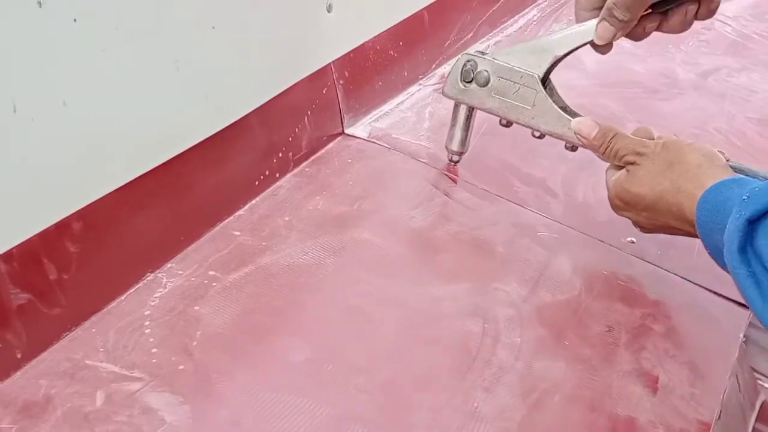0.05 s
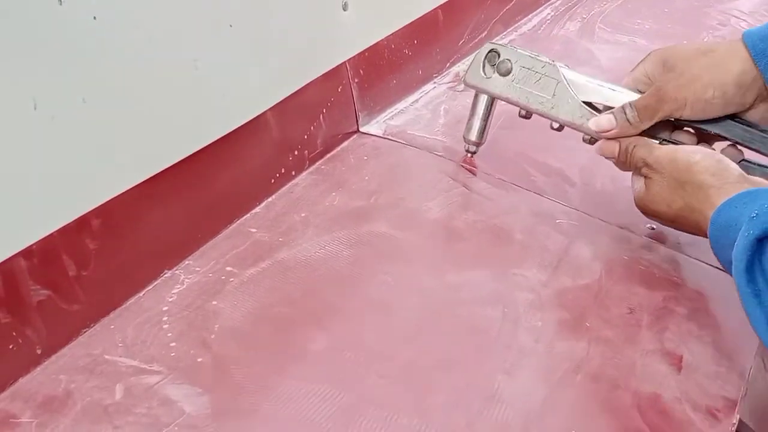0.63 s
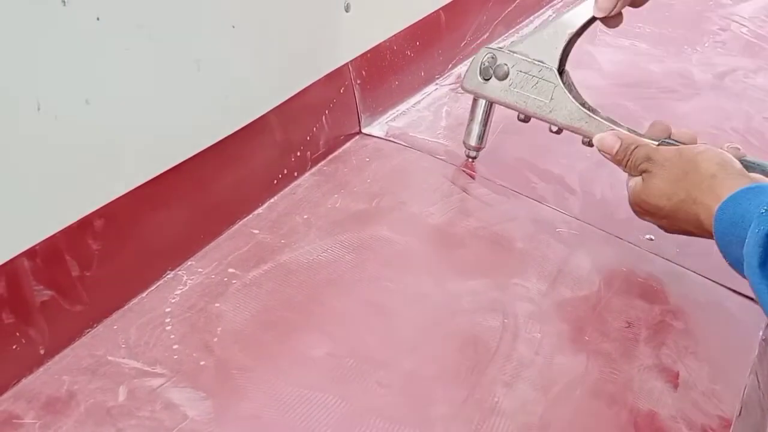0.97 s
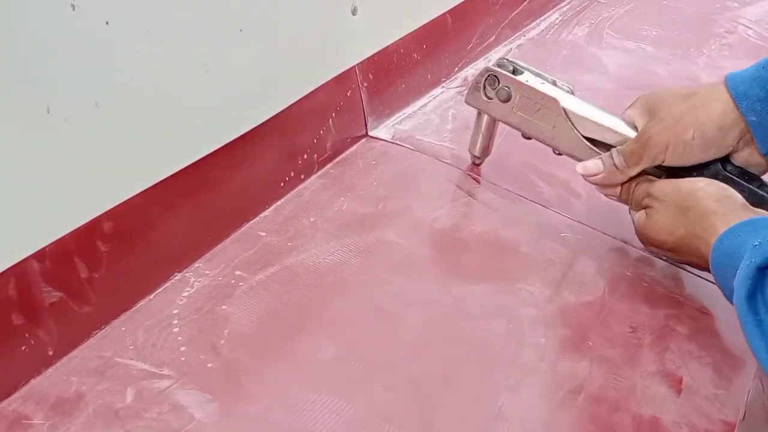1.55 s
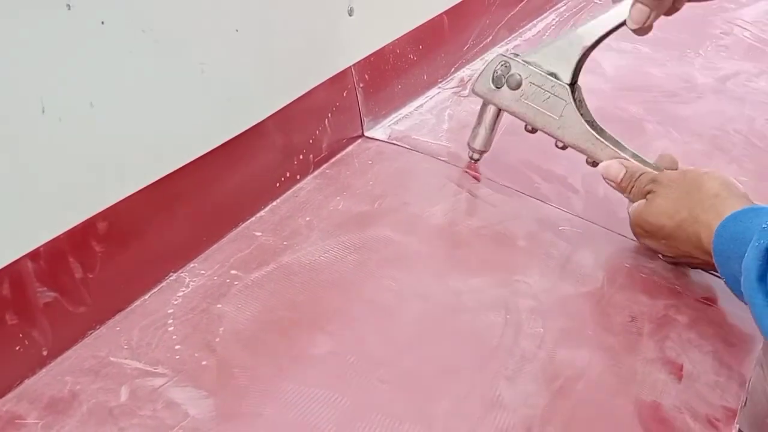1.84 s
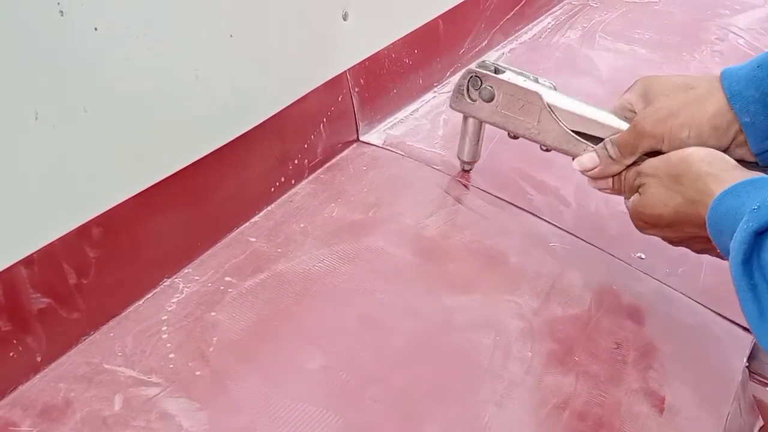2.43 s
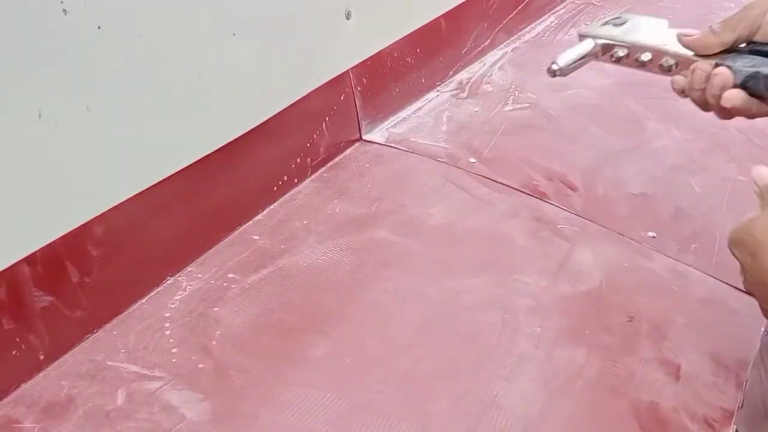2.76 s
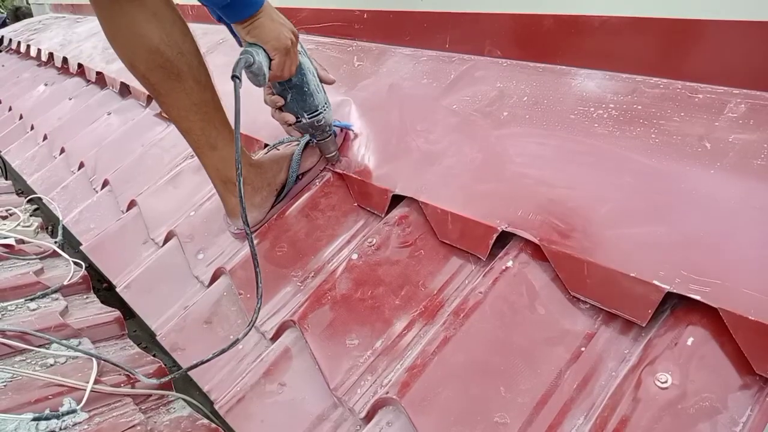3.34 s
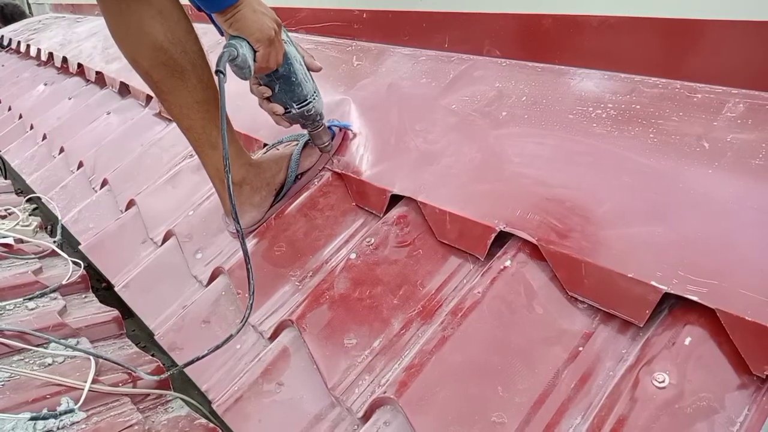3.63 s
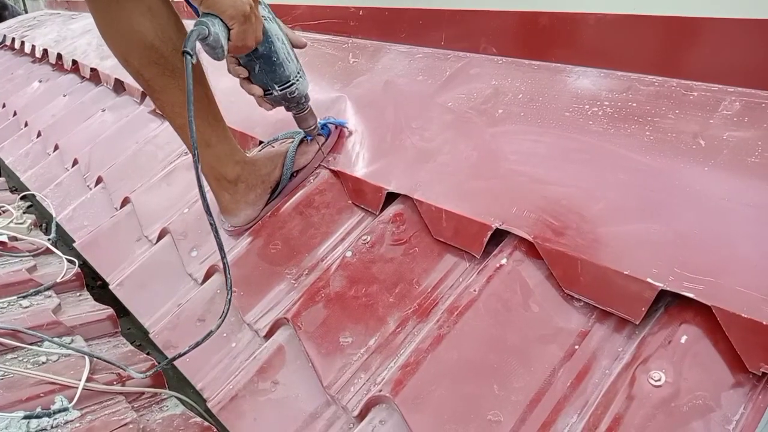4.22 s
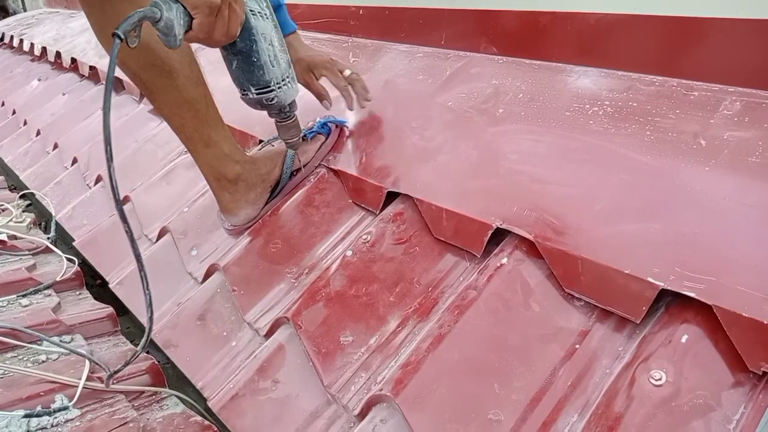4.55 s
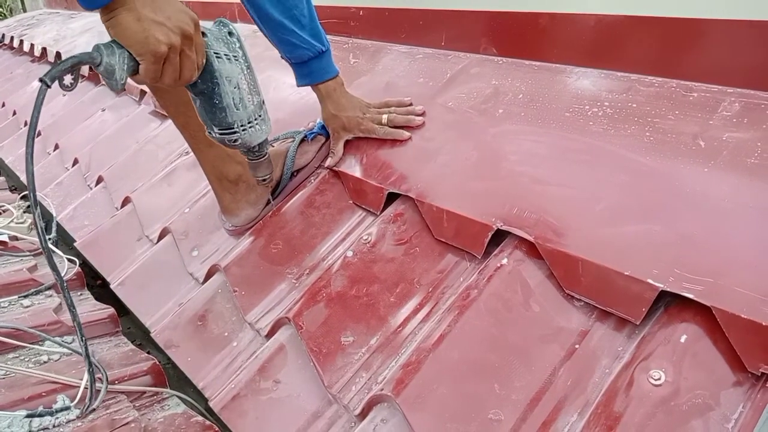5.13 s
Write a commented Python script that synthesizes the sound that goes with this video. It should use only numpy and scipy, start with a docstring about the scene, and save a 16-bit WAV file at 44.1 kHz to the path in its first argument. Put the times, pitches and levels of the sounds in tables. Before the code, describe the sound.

On a sheet-metal roof, a hand rivet gun clicks close to the microphone, its jolts crashing through the loose flashing while someone hammers dully far away. The lever squeals and the hardest snaps follow. After a moment of silence, an electric drill spins up with a high whine, scrapes and shrieks into the steel in three quick bites, then coasts down under gusts of wind rumbling on the microphone.

```python
"""On a sheet-metal roof, one microphone close to the work. From the start someone hammers far off, while
nearby a hand rivet gun clicks and its blows crash through the loose flashing. From about 1 s its lever
squeals, and the hardest snaps follow. Near 3 s comes a moment of silence. Then a corded drill spins up,
wind buffets the microphone, the bit bites into the steel three times, and the motor coasts down."""
import sys
import numpy as np
from scipy import signal
from scipy.fft import rfft, irfft, next_fast_len
from scipy.io import wavfile
from scipy.ndimage import uniform_filter1d

SR = 44100
rng = np.random.default_rng(int(sys.argv[2]) if len(sys.argv) > 2 else 0)


def output_pcm(signal):
    """Save a mono or channel-first signal as 16-bit PCM at the path in sys.argv[1].

    Samples are clipped to [-1, 1] before scaling.
    """
    pcm = np.clip(np.atleast_2d(signal).T, -1, 1) * 32767
    wavfile.write(sys.argv[1], SR, np.round(pcm).astype(np.int16))


N = 228481
TIME = np.arange(N) / SR
RIVETING_END_S, DRILL_START_S, FULL_LEVEL_S = 2.918, 3.115, 3.23


def from_db(db):
    """Decibels to gain."""
    return 10 ** (np.asarray(db) / 20)


def rms_one(x):
    """Scale to unit power."""
    return x / np.sqrt(np.mean(x ** 2) + 1e-20)


def at_hz(points, hz):
    """Read a spectrum on a log-frequency axis."""
    pitches, levels = np.array(points).T
    return np.interp(np.log(hz), np.log(pitches), levels)


def drift(rate_hz):
    """Smooth random wander with spread 1."""
    r = np.exp(-80 * np.pi * rate_hz / SR)
    slow = signal.lfilter([1], [1, -2 * r, r * r], rng.standard_normal(N // 40 + 2002))[2000:]
    return np.interp(np.arange(N) / 40, np.arange(len(slow)), rms_one(slow))


def noise(spectrum, size=N, tilt=0):
    """Noise of a given colour, tilted in dB per octave, falling off steeply past its ends."""
    padded = next_fast_len(size)
    hz = np.maximum(np.fft.rfftfreq(padded, 1 / SR), 1)
    octaves_outside = np.abs(np.log2(hz / np.clip(hz, spectrum[0][0], spectrum[-1][0])))
    gain = from_db(at_hz(spectrum, hz) + tilt * np.log2(hz) - 24 * octaves_outside)
    return rms_one(irfft(rfft(rng.standard_normal(padded)) * gain, padded)[:size])


def resonate(x, hz, width):
    """A resonance with gain 1 at its peak."""
    r = np.exp(-np.pi * width / SR)
    feedback = [1, -2 * r * np.cos(2 * np.pi * hz / SR), r * r]
    return signal.lfilter(np.array([1, 0, -1]) * (1 - r * r) / 2, feedback, x)


def low_pass(x, hz, order=2):
    """Butterworth low-pass."""
    return signal.sosfilt(signal.butter(order, hz, fs=SR, output="sos"), x)


def onset(t, rise_s=.0004):
    """Exponential rise from 0 to 1."""
    return 1 - np.exp(-t / rise_s)


def dying(t, t60):
    """Free decay, 60 dB in t60, full height before t = 0."""
    return np.exp(-np.log(1000) * np.maximum(t, 0) / max(t60, 1e-3))


def swell(s, half_s):
    """A brief bell-shaped rise and fall."""
    return np.exp(-.5 * ((TIME - s) / half_s) ** 2)


def small_ring(pitches, t):
    """A cluster of close modes, strongest in the middle."""
    weights = np.hanning(len(pitches) + 2)[1:-1]
    return weights @ np.sin(2 * np.pi * (pitches[:, None] * t + rng.random((len(pitches), 1))))


def add(out, s, sound):
    """Mix a sound in at a time."""
    start = max(round(s * SR), 0)
    out[start:start + len(sound)] += sound[:N - start]


# open air around the roof: (frequency [Hz], density [dB])
AIR_SPECTRUM = [(29, -50), (50, -18), (214, 11), (613, -5), (690, -16.5), (941, -8), (2630, -25.5),
                (3100, -17), (3340, -25), (4890, -18), (5380, -21), (6990, -30), (15000, -59.5)]
def outdoor_air(level_db=-47, fade_db_per_s=0.9):
    """The distant outdoor background wavers and slowly calms over a faint steady hiss."""
    background = from_db(level_db - fade_db_per_s * TIME + 2.9 * drift(24)) * noise(AIR_SPECTRUM)
    return background + from_db(-76.5) * rng.standard_normal(N)


# the hammer as heard from the roof: (frequency [Hz], density [dB])
HAMMER_SPECTRUM = [(59, -46.5), (100, -28), (134, -7.5), (187, -0.5), (540, -3), (675, -10.5), (810, -5),
                   (1130, -6), (1980, -29), (2800, -46.5), (3640, -67.5), (6160, -120)]
# its blows: (time [s], relative level [dB])
HAMMER_BLOWS = [(0, -40.5), (.277, -36.5), (0.554, -35), (1.118, -34), (1.386, -36), (1.92, -55),
                (2.148, -37)]
def far_hammer(rise_s=0.0077, t60=0.44, bass_t60=0.54, bass_hz=400):
    """Distant blows reach the microphone dull and smeared by the surrounding walls."""
    out, t = np.zeros(N), TIME[:SR * 3 // 4]
    for s, level_db in HAMMER_BLOWS:
        wash = noise(HAMMER_SPECTRUM, size=len(t), tilt=0.21)
        bass = low_pass(wash, bass_hz, order=1)
        thud = bass * dying(t, bass_t60) + (wash - bass) * dying(t, t60)
        add(out, s - rise_s, from_db(level_db + 4.5) * onset(t, rise_s) * thud)
    return out


# crash of the flashing, close by: (frequency [Hz], density [dB])
FLASHING_SPECTRUM = [(53, -57.5), (90, -26.5), (172, -7), (255, -1), (753, -7), (804, -3), (1110, -3),
                     (1540, -4.5), (1680, -6.5), (2530, -14), (3830, -8.5), (6870, -13), (11100, -30),
                     (15000, -27.5), (16000, -48.5)]
# its ringing: (frequency [Hz], relative level [dB], t60 [s])
FLASHING_MODES = [(355, -11.5, 1), (1215, -11.5, 0.49), (1440, -0.5, 0.12), (1520, 3, 0.41),
                  (2240, 0, 0.098), (2755, -2.5, 0.15), (3040, -39, 5.0), (4200, -13.5, 0.35),
                  (3950, -17, 1.2), (4910, -17.5, 0.45), (5600, -24, 4.7), (5636, -27, 0.41)]
# blows from the rivet gun: (time [s], level [dB], rattling time [s], t60 [s], tilt [dB/octave])
GUN_BLOWS = [(0, -43, 0.041, 0.14, -2), (.129, -30.5, 0.0061, .28, -1), (0.285, -39.5, .002, .13, -1),
             (.372, -44, 0.0016, 0.44, -1.5), (.459, -50, .004, 0.17, .5), (.738, -43, 0.0081, 0.28, 2.5),
             (.799, -22, 0.024, 0.3, -0.5), (1.329, -40, .02, 0.58, 1.5), (1.651, -33, 0.0036, 0.056, .5),
             (1.669, -41.5, 0.067, 0.78, 1.5), (1.727, -19.5, .012, 0.39, 0),
             (1.862, -35.5, 0.073, .16, -0.4), (2.266, -27.5, 0.018, 0.061, -2),
             (2.279, -19.5, 0.0046, 0.018, 1), (2.2997, -17.5, 0.0011, 0.041, 7),
             (2.303, -29.5, 0.055, .22, -0.5), (2.349, -28, 0.032, 0.34, -3.5),
             (2.539, -40, 0.015, 0.23, 0), (2.637, -50.5, 0.012, 0.055, 1.5)]
def flashing(bass_hz=600, treble_hz=7000, bass_t60_ratio=1.99, treble_t60_ratio=0.22):
    """Each blow rattles the loose sheet: a dense wash dies away, lows last, and hard blows clank."""
    out, t = np.zeros(N), TIME[:SR * 3 // 4]
    for s, level_db, rattle_s, t60, tilt in GUN_BLOWS:
        wash = noise(FLASHING_SPECTRUM, size=len(t), tilt=tilt)
        bass, body = low_pass(wash, bass_hz, order=1), low_pass(wash, treble_hz, order=1)
        free_s = t - rattle_s
        crash = (bass * dying(free_s, t60 * bass_t60_ratio)
                 + (body - bass) * dying(free_s, t60)
                 + (wash - body) * dying(free_s, t60 * treble_t60_ratio))
        crash *= from_db(drift(250)[:len(t)])   # the sheet slaps its support
        clank = np.zeros(len(t))
        for hz, db, ring_s in FLASHING_MODES:
            strength = from_db(db + 3 * rng.standard_normal())
            clank += strength * np.sin(2 * np.pi * (hz * t + rng.random())) * dying(t, ring_s)
        clank *= dying(free_s, 2 * t60) / np.std(clank[:SR // 50])
        clank_db = -5 + 0.66 * (level_db + 17.5) - abs(tilt)
        add(out, s, from_db(level_db) * (crash + from_db(clank_db) * clank) * onset(t))
    return out


# ticks of the gun in the hand: (frequency [Hz], density [dB])
TICK_SPECTRUM = [(2000, -11.5), (4000, 12.5), (5500, 4.5), (7500, 8), (10500, -19), (15000, -6.5)]
def loose_parts(rest_per_s=25, shaken_per_s=72, shake_t60=0.25, tick_t60=0.02):
    """Loose parts of the gun touch at random and ring brightly, faster and louder after each blow."""
    shake = sum(from_db(db) * (TIME > s) * dying(TIME - s, shake_t60) for s, db, *_ in GUN_BLOWS)
    per_s = rest_per_s + shaken_per_s * np.sqrt(shake / shake.max())
    strength = from_db(-41) + from_db(-11) * shake
    touches = (rng.random(N) < per_s / SR) * strength
    touches *= from_db(4 * np.clip(rng.standard_normal(N), -2, 1))
    t = TIME[:SR // 25]
    tick = noise(TICK_SPECTRUM, size=len(t)) * dying(t, tick_t60)
    return .35 * signal.fftconvolve(touches, tick)[:N]


# the roof panel under the gun: (time [s], relative level [dB], pitch [Hz], t60 [s])
PANEL_KNOCKS = [(.005, -27, 379.6, 0.58), (0.131, -28, 327, 0.66), (1.667, -19, 427, 0.18),
                (1.67, -34, 116.7, 0.67), (2.298, -12.5, 523, 0.044), (2.605, -33, 271, 0.33)]
def panel_knocks(spread=.3):
    """The panel answers the gun with hollow knocks, each a cluster of low modes."""
    out, t = np.zeros(N), TIME[:SR // 4]
    for s, level_db, hz, t60 in PANEL_KNOCKS:
        ring = small_ring(hz * (1 + spread * np.linspace(-1, 1, 7)), t)
        add(out, s, from_db(level_db) * 0.29 * ring * dying(t, t60) * onset(t, rise_s=0.0025))
    return out


# jaws, spring and pivot, close by: (time [s], relative level [dB], pitch [Hz], t60 [s])
GUN_CLICKS = [(0.034, -28, 6840, 0.013), (.409, -31.5, 3000, 0.026), (.97, -35, 7550, 0.034),
              (.981, -22, 6750, 0.016), (1.3284, -17.5, 2960, .024), (1.327, -15, 6930, 0.0068),
              (1.635, -29.5, 7150, 0.018), (1.653, -28, 4870, 0.02), (1.669, -26, 5100, .028),
              (1.681, -24, 4290, 0.037), (1.971, -31, 7700, 0.016), (2.713, -41, 3950, .028)]
def gun_clicks(spread=0.14, crack_db=-9, crack_t60=0.027):
    """Small steel parts click with a crack and a few short modes."""
    out, t = np.zeros(N), TIME[:SR // 4]
    for s, level_db, hz, t60 in GUN_CLICKS:
        pitches = hz * (1 + spread * np.linspace(-1, 1, 7) + rng.normal(0, 0.013, 7))
        ring = 0.57 * small_ring(pitches, t) * dying(t, t60)
        crack = from_db(crack_db) * low_pass(rng.standard_normal(len(t)), 7600) * dying(t, crack_t60)
        add(out, s, from_db(level_db) * (ring + crack) * onset(t))
    return out


# lever strokes: (time [s], length [s], first pitch [Hz], last pitch [Hz], level [dB], rasp [0-1])
LEVER_STROKES = [(1.067, 0.33, 3440, 3370, -49.5, .85), (1.338, .3, 3470, 3510, -40.5, .7),
                 (1.973, 0.188, 3140, 3170, -58, 0.1)]
def lever_squeal(upper_db=-22, lower_db=-17, waver=.012):
    """The lever squeals in gliding strokes, with an inharmonic upper mode and a hoarse lower octave."""
    def slipping(phase, rate_hz):
        """Uneven slips smear a tone into a narrow band."""
        return drift(rate_hz) * np.sin(phase) + drift(rate_hz) * np.cos(phase)

    out = np.zeros(N)
    for s, length_s, first_hz, last_hz, level_db, rasp in LEVER_STROKES:
        progress = np.clip((TIME - s) / length_s, 0, 1)
        hz = (first_hz + (last_hz - first_hz) * progress) * (1 + waver * rasp * drift(7.9))
        phase = 2 * np.pi * np.cumsum(hz) / SR
        upper = slipping(1.86 * phase, 250) * from_db(upper_db + 5 * drift(6))
        lower = rasp * from_db(lower_db) * slipping(phase / 2, 120)
        main = np.sqrt(1 - rasp ** 2) * np.sin(phase) + 0.56 * rasp * slipping(phase, 130)
        arch = 2 * np.sqrt(progress * (1 - progress))
        out += from_db(level_db) * arch * (main + upper + lower)
    return out


START_TURNS_PER_S, TOP_TURNS_PER_S = 201.85, 342.21
def rotor_speed(run_up_s=.12205, trigger_off_s=3.4901, bit_free_s=3.7808, step_s=.001):
    """Turns per second: a run-up under power, then a coast against bearings, air and briefly the bit."""
    bearing_drag, bit_drag = 83.65, 70.57   # turns per second squared
    times, speeds = np.arange(DRILL_START_S, TIME[-1], step_s), [START_TURNS_PER_S]
    for s in times[:-1]:
        speed = speeds[-1]
        drive = (TOP_TURNS_PER_S - speed) / run_up_s
        air_drag = .000965 * speed ** 2
        drag = bearing_drag + air_drag + bit_drag * (s < bit_free_s)
        speeds.append(speed + step_s * (drive if s + step_s < trigger_off_s else -drag))
    return np.interp(TIME, times, speeds)


# the fan's whine, close by: (pitch [Hz], level [dB])
FAN_WHINE = [(4100, -71), (4700, -40.5), (5350, -61), (6100, -48), (6800, -48.5), (8200, -37), (8800, -27),
             (9600, -22), (10600, -27.5), (11700, -28.5), (13200, -31)]
# tone of the meshing teeth: (pitch [Hz], level [dB])
GEAR_MESH = [(425, -32), (455, -43), (500, -56), (540, -44), (650, -38.5), (790, -31), (930, -31.5),
             (1130, -38.5), (1240, -35), (1320, -29)]
# gear harmonics: (multiple of the tooth rate, resonance [Hz], width [Hz], level [dB])
GEAR_RESONANCES = [(2, 2650, 140, -32), (2, 1850, 210, -44), (2, 1280, 215, -36), (3, 3900, 260, -28.5),
                   (3, 3020, 250, -33.5), (3, 2663, 146, -29.5), (3, 1570, 710, -40), (4, 2320, 150, -27),
                   (5, 2600, 155, -36), (7, 3600, 370, -40), (8, 3700, 140, -36.5)]
# response of the drill's housing: (frequency [Hz], gain [dB])
HOUSING_RESPONSE = [(500, -39), (1000, -3.5), (1300, -6.5), (1900, -5.5), (2350, 2.5), (2800, -7),
                    (3300, -27), (3900, 0), (4800, -31), (9000, -11)]
# its resonances: (frequency [Hz], width [Hz], relative level [dB])
HOUSING_RESONANCES = [(1260, 51, -1), (1970, 79, -20.5), (2355, 65, 15), (2550, 130, -30), (3660, 140, 6)]
# gearbox rattle and air rush: (frequency [Hz], density [dB])
RUSH_SPECTRUM = [(290, -74), (500, -18.5), (784, -1), (1130, -6.5), (1230, -5), (1980, -3.5), (2330, 1),
                 (2500, -1.5), (3750, -4.5), (6700, -23.5), (9490, -9.5), (10700, -13), (11300, -14.5),
                 (14900, -26), (16000, -25)]
def drill(blades=39, teeth=4, flutter_db=4.0, jitter=0.0007, play_rad=0.035):
    """One rotor drives fan whine, gear tones, shaft harmonics and a rattle that beats with the teeth."""
    speed = rotor_speed()
    rush_db = -21 + 8 * np.log2(speed / TOP_TURNS_PER_S)
    angle = 2 * np.pi * np.cumsum(speed * (1 + jitter * drift(46))) / SR
    backlash = play_rad * drift(83)   # the teeth wander in their play, roughening the upper tones

    def tone(multiple, slack=0):
        """A multiple of the rotor speed, fluttering in strength."""
        phase = multiple * (angle + slack) + rng.uniform(0, 2 * np.pi)
        flutter = from_db(flutter_db * drift(20.2))
        return np.sqrt(2) * np.sin(phase) * flutter * (multiple * speed < SR / 2)

    # an unbalanced fan adds a side line on each side of its blade rate
    fan = tone(blades) + from_db(-20) * (tone(blades - 1) + tone(blades + 1))
    out = from_db(at_hz(FAN_WHINE, blades * speed)) * fan
    out += from_db(-52) * (speed / 200) ** 2 * tone(2 * blades)
    out += from_db(at_hz(GEAR_MESH, teeth * speed)) * tone(teeth, backlash)
    for harmonic, hz, width, db in GEAR_RESONANCES:   # each swells as it sweeps through its resonance
        multiple = harmonic * teeth
        detuning = 2 * (multiple * speed - hz) / width
        out += from_db(db) / (1 + detuning ** 2) * tone(multiple, backlash)
    for multiple in range(5, 16):
        shaft_db = rush_db - 15 + at_hz(HOUSING_RESPONSE, multiple * speed)
        out += from_db(shaft_db) * tone(multiple, backlash)
    beat = 1 + .35 * np.cos(angle) + .3 * np.cos(teeth * angle)
    chatter = beat * rng.standard_normal(N)
    housing = sum(from_db(db) * resonate(chatter, hz, width) for hz, width, db in HOUSING_RESONANCES)
    rush = from_db(rush_db - 3 + 1.6 * drift(27)) * rms_one(noise(RUSH_SPECTRUM) * beat)
    return out + from_db(-35) * rms_one(housing) + rush


# paths to the microphone off the roof and the wall: (delay [s], gain [dB])
ROOF_ECHOES = [(.0031, -18), (.0074, -19), (0.0124, -16.5), (0.0208, -27)]
def roof_reflections(direct):
    """Close hard surfaces comb the sound, so that gliding tones flutter."""
    out = direct.copy()
    for delay_s, db in ROOF_ECHOES:
        add(out, delay_s, from_db(db) * direct)
    return out / np.sqrt(1 + sum(from_db(db) ** 2 for _, db in ROOF_ECHOES))


# wind right on the microphone: (frequency [Hz], density [dB])
WIND_SPECTRUM = [(18, -57), (30, -58.5), (71, -2.5), (142, 6.5), (250, -0.5), (357, -6.5), (423, -9.5),
                 (509, -15), (613, -20), (781, -23.5), (900, -31.5), (1170, -42), (1980, -120)]
# its gusts: (time [s], level [dB], half length [s], tilt [dB/octave])
WIND_GUSTS = [(3.229, -14.5, 0.018, 1.5), (3.307, -22, 0.0068, -3), (3.54, -23, .007, 4),
              (3.615, -14, 0.0086, 4), (3.709, -20, 0.0065, 4), (3.947, -10.5, .008, -1.2),
              (4.064, -11, 0.055, -0.1), (4.162, -12.5, 0.054, 0.5), (4.343, -17, 0.0097, -6.5),
              (4.403, -16, 0.015, -3.2), (4.504, -21, 0.011, -4), (4.589, -16, .009, -0.8),
              (4.663, -14, .02, 2.5), (4.839, -13.5, 0.016, 3.5), (4.929, -16, 0.018, -3),
              (5.015, -18, 0.009, 4), (5.112, -12.5, 0.024, -1), (5.186, -14.5, 0.025, 9)]
def wind(rumble_db=-26.5, lump_db=3.0, gust_lump_db=1.2, rise_db_per_s=0.5):
    """Lumpy low rumble on the microphone port, slowly freshening, with sudden gusts."""
    freshening_db = rise_db_per_s * (TIME - FULL_LEVEL_S)
    out = from_db(rumble_db + freshening_db + lump_db * drift(31)) * noise(WIND_SPECTRUM)
    for s, level_db, half_s, tilt in WIND_GUSTS:
        eddies = noise(WIND_SPECTRUM, tilt=tilt)
        eddies /= np.sqrt(uniform_filter1d(eddies ** 2, size=700) + 1e-6)   # every gust at full strength
        out += from_db(level_db + gust_lump_db * drift(28)) * swell(s, half_s) * eddies
    return out


# the bit scraping steel, close by: (frequency [Hz], density [dB])
SCRAPE_SPECTRUM = [(150, -40), (250, -3), (409, -34), (453, -4), (690, -7.5), (909, -2), (1420, -8.5),
                   (2080, -6), (4110, -8.5), (5250, -32), (8000, -14), (10400, -52), (17600, -120)]
# the sheet ringing under it: (frequency [Hz], width [Hz], relative level [dB])
DRILLED_SHEET_MODES = [(449.6, 16, 4), (910, 19, 1.5), (1803, 32, -9), (2470, 24, -30.5), (2880, 41, -14),
                       (3040, 23, -4.5), (3522, 45, -6), (4205, 80, -8.5)]
# bites: (time [s], hold [s], scrape level [dB], ring level [dB])
BIT_BITES = [(3.255, 0.025, -17, -15), (3.444, 0.12, -19.5, -47), (3.655, 0.038, -30, -36)]
# groans and shrieks as it catches: (time [s], level [dB], pitch [Hz], width [Hz], half length [s])
BIT_SHRIEKS = [(3.267, -29, 468, 30.5, 0.013), (3.268, -25, 898, 41, 0.015),
               (3.29, -22.5, 1844, 49.4, 0.039), (3.434, -25, 940, 249.5, 0.043),
               (3.507, -21.5, 1990, 71, 0.018), (3.532, -21.5, 2105, 59, 0.024),
               (3.557, -23.5, 2840, 121, 0.016), (3.586, -22, 4050, 600, 0.012),
               (3.534, -22.5, 13000, 2230, 0.013), (3.657, -24.5, 14100, 2380, 0.016),
               (3.772, -29, 10700, 813, 0.017)]
def drill_bit(attack_s=0.026, scrape_t60=0.41, ring_t60=0.17):
    """With each bite the bit scrapes unevenly, rings the sheet and shrieks briefly."""
    scrape = noise(SCRAPE_SPECTRUM) * from_db(drift(230))
    scrape = rms_one(low_pass(scrape, 4700, order=6) + 0.44 * scrape)
    ring = rms_one(sum(from_db(db) * resonate(rng.standard_normal(N), hz, width)
                       for hz, width, db in DRILLED_SHEET_MODES))
    out = np.zeros(N)
    for s, hold_s, scrape_db, ring_db in BIT_BITES:
        attack = np.where(TIME < s, swell(s, attack_s), 1)
        free_s = TIME - s - hold_s
        out += from_db(scrape_db) * attack * dying(free_s, scrape_t60) * scrape
        out += from_db(ring_db) * attack * dying(free_s, ring_t60) * ring
    for s, level_db, hz, width, half_s in BIT_SHRIEKS:
        wander = width / 2 * drift(width / 2)   # stick and slip shake the pitch
        phase = 2 * np.pi * np.cumsum(hz + wander) / SR
        out += from_db(level_db) * swell(s, half_s) * np.sqrt(2) * np.sin(phase)
    return out


def scene(fade_in_db_per_s=401.5):
    """Riveting, a silent pause, then drilling; the one microphone feeds both channels."""
    riveting = outdoor_air() + flashing() + gun_clicks() + panel_knocks() + loose_parts()
    riveting += far_hammer() + lever_squeal()
    bass_cut = signal.butter(1, 90, "high", fs=SR, output="sos")   # thin sheet radiates little deep bass
    riveting = signal.sosfilt(bass_cut, riveting)
    drilling = roof_reflections(drill()) + drill_bit() + wind()
    drilling *= from_db(fade_in_db_per_s * np.minimum(TIME - FULL_LEVEL_S, 0))
    mono = riveting * (TIME < RIVETING_END_S) + drilling * (TIME > DRILL_START_S)
    return np.array([mono, mono])


def record(dry, ceiling=1.2, cutoff_hz=15700):
    """The recorder rounds the peaks and cuts the highest treble."""
    rounded = ceiling * np.tanh(dry / ceiling)
    return signal.sosfilt(signal.ellip(10, .1, 80, cutoff_hz, fs=SR, output="sos"), rounded)


dry = scene()
out = record(dry)
output_pcm(out)
```